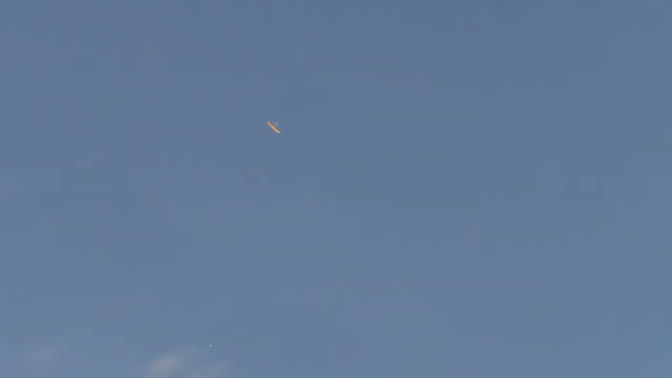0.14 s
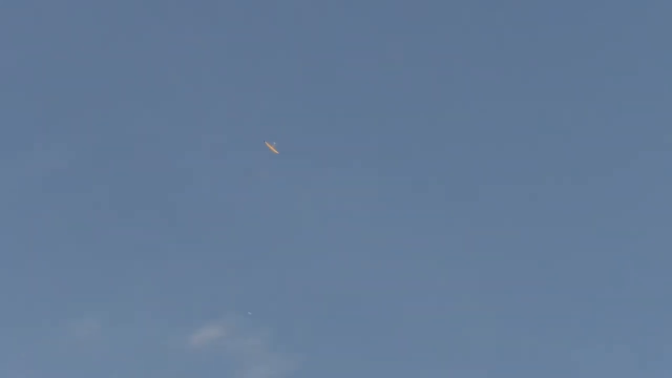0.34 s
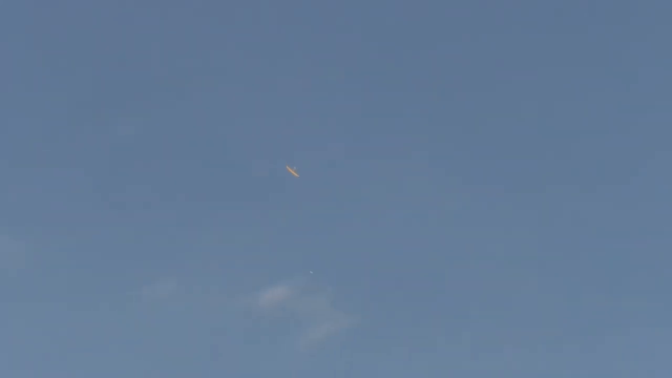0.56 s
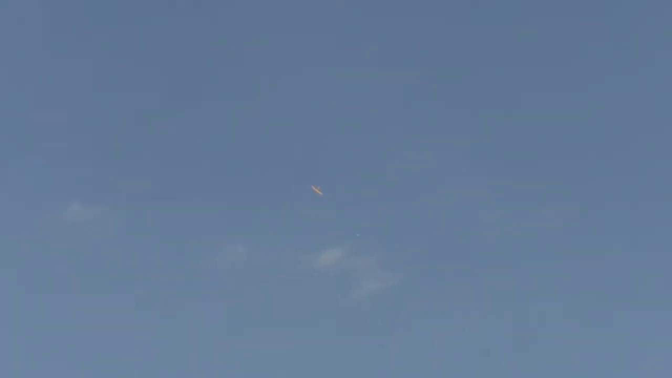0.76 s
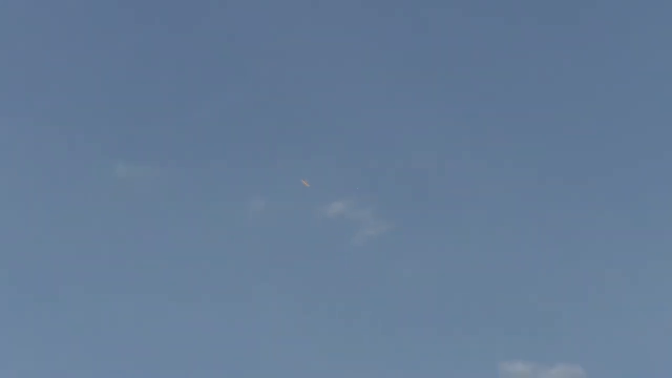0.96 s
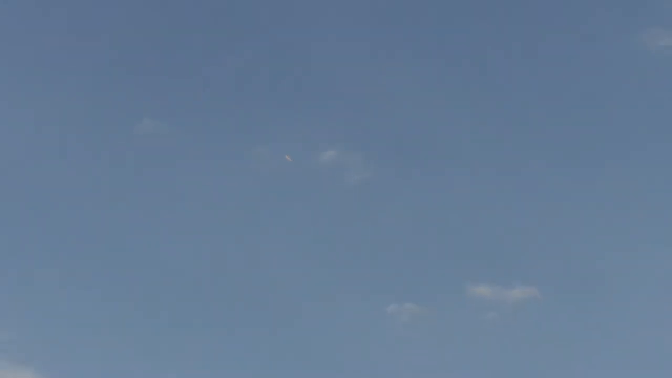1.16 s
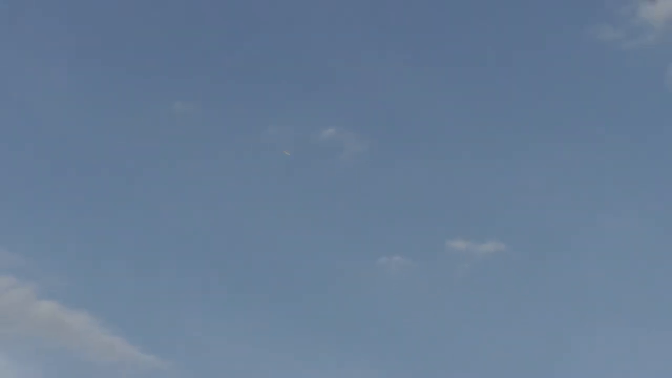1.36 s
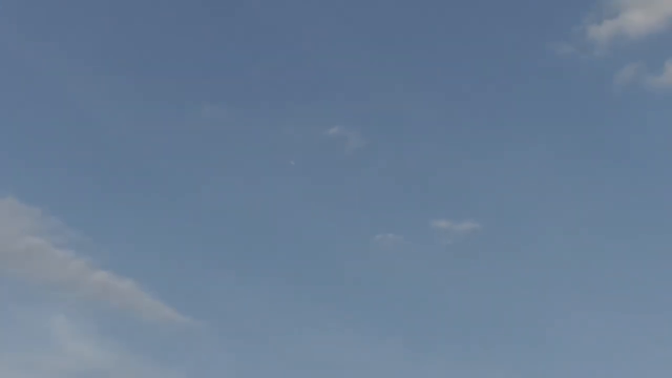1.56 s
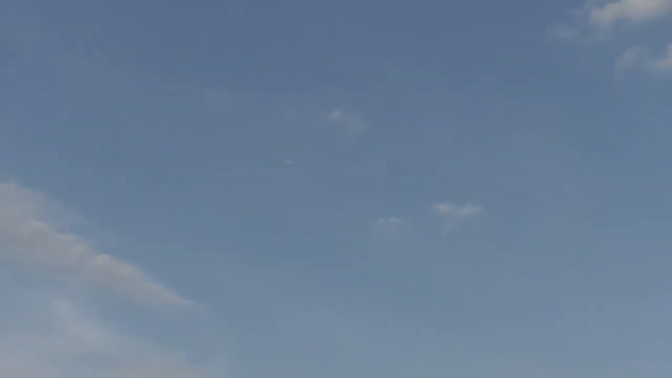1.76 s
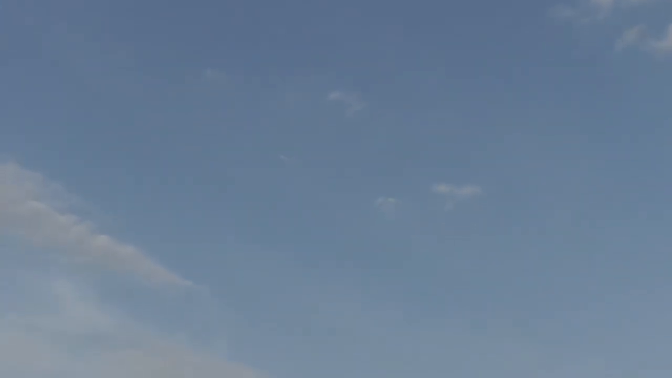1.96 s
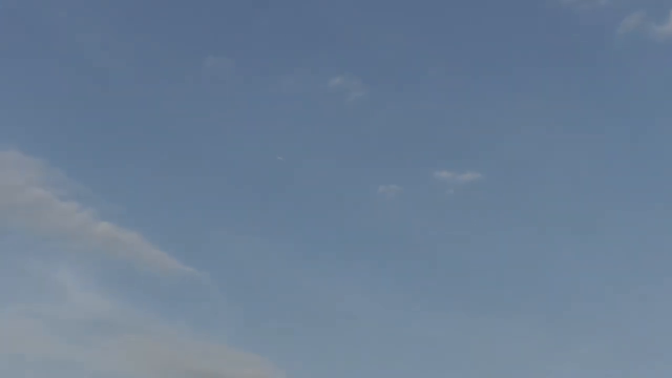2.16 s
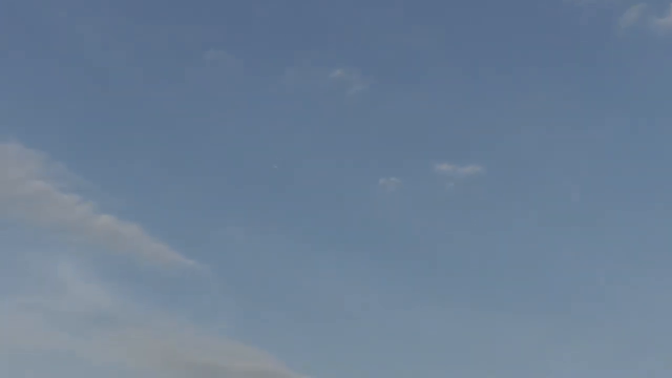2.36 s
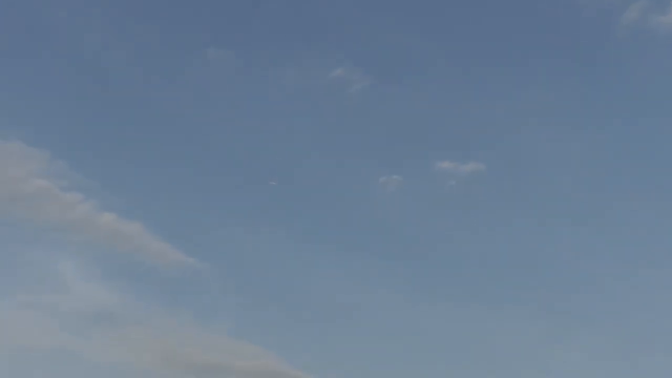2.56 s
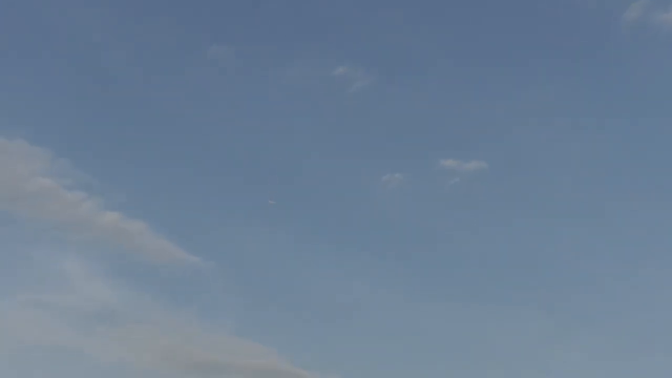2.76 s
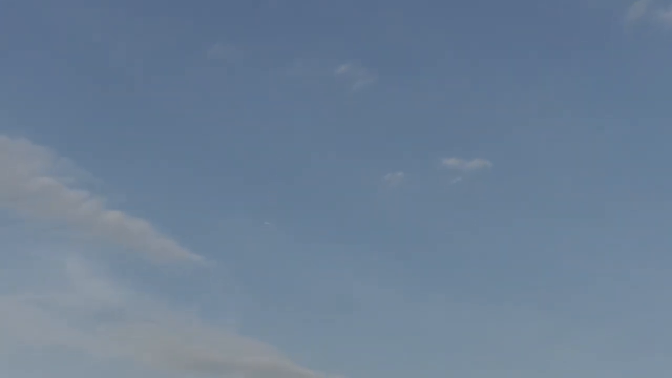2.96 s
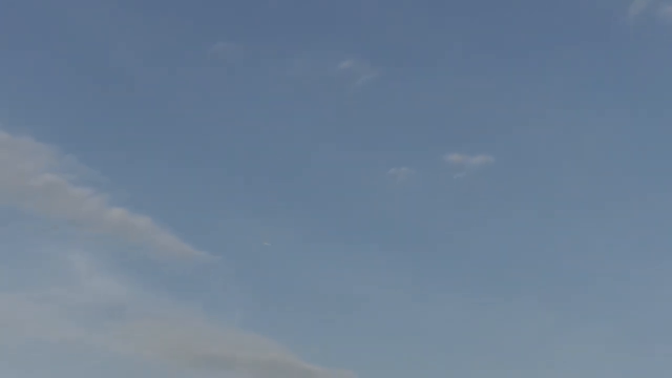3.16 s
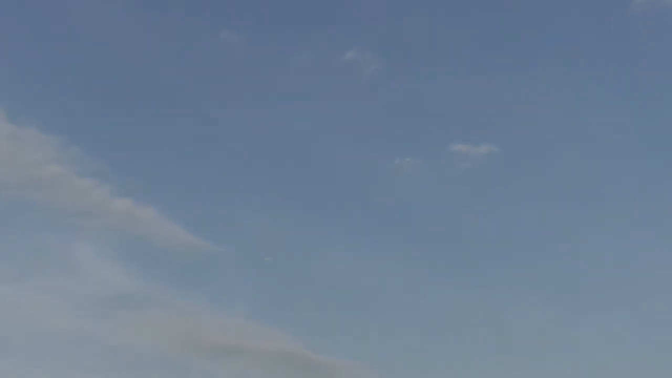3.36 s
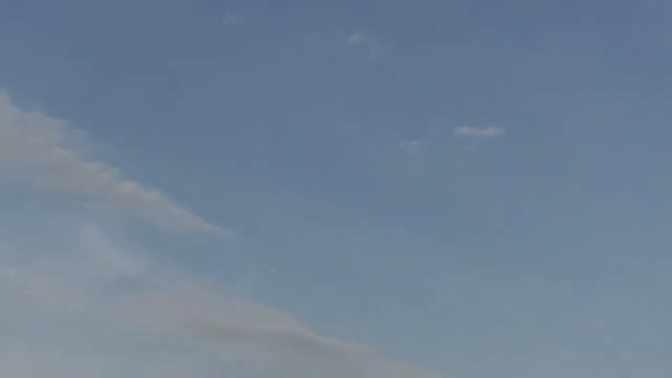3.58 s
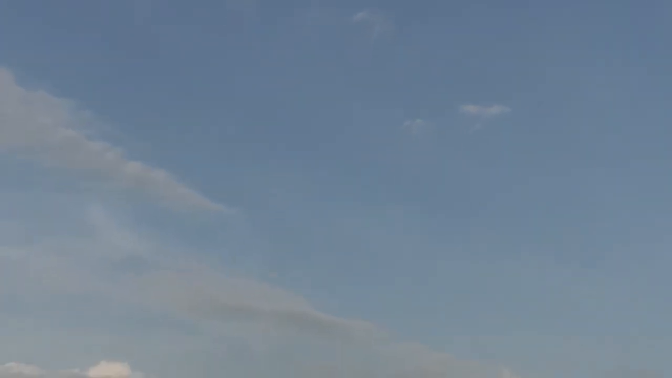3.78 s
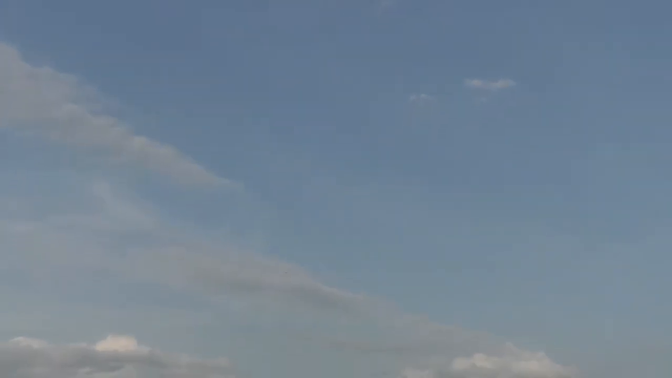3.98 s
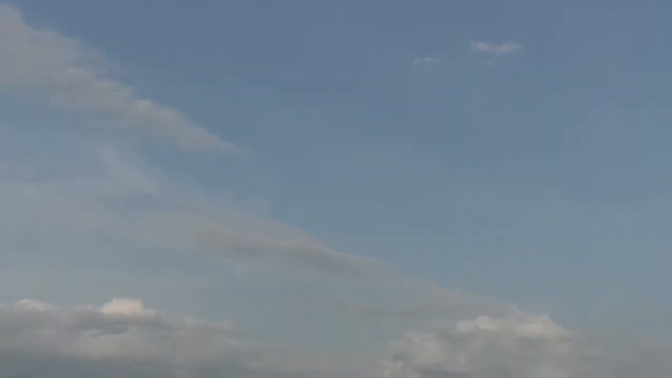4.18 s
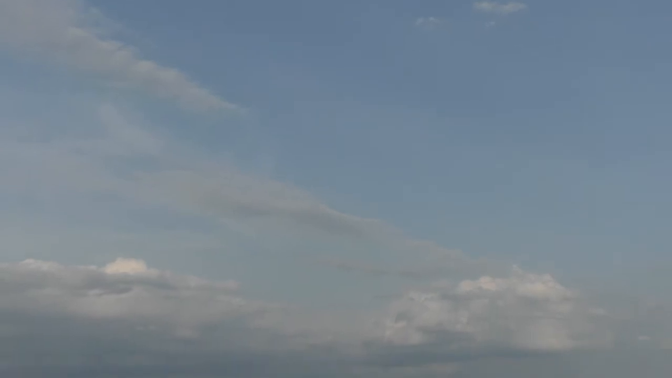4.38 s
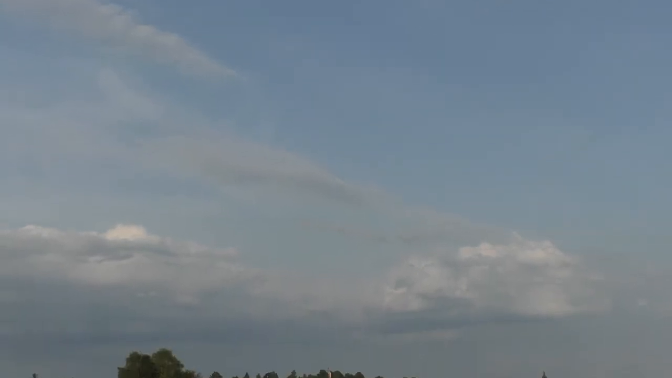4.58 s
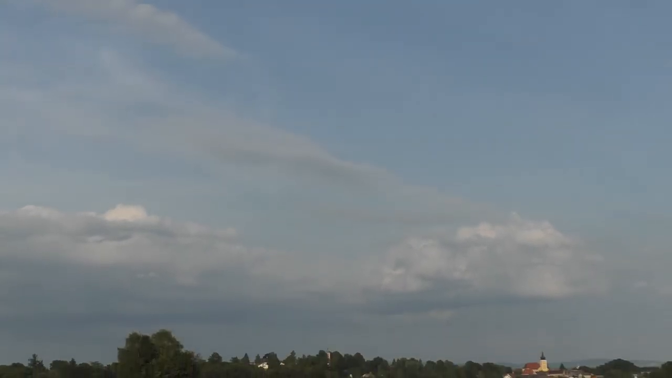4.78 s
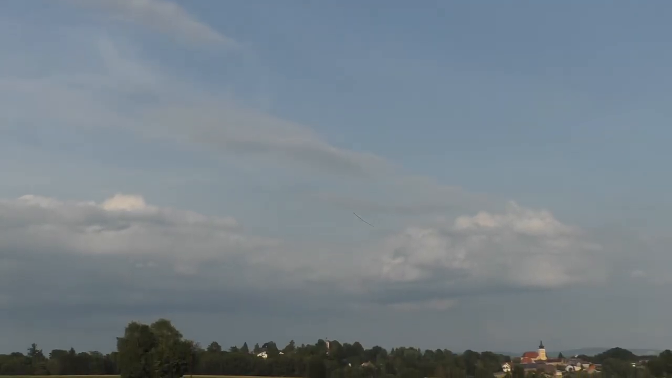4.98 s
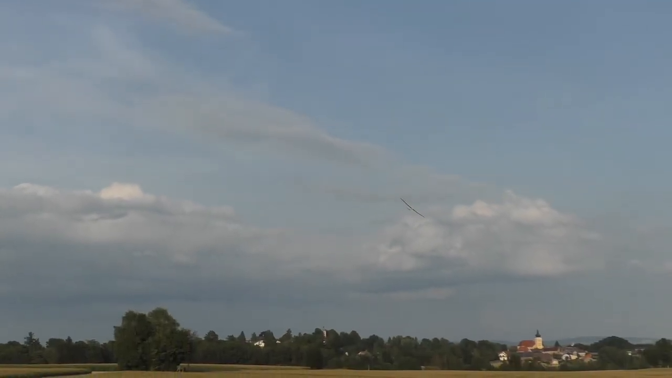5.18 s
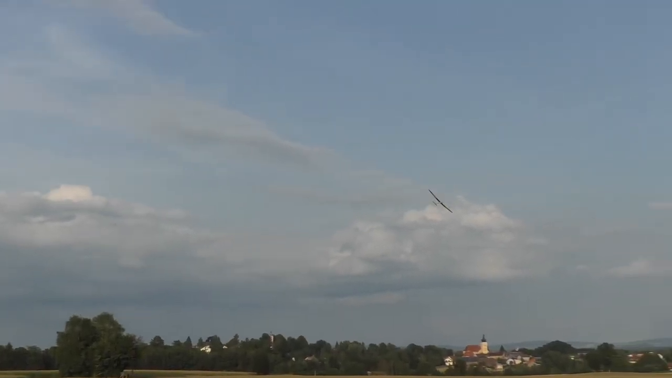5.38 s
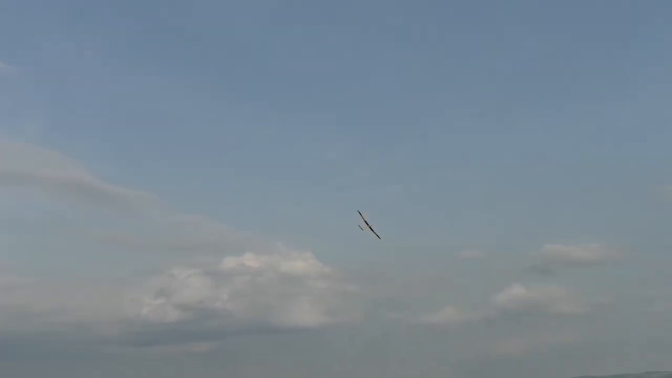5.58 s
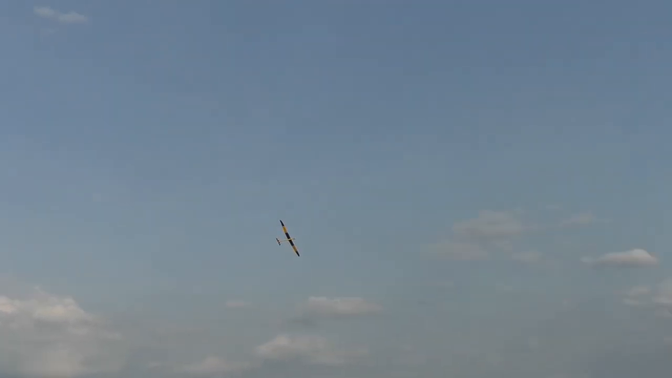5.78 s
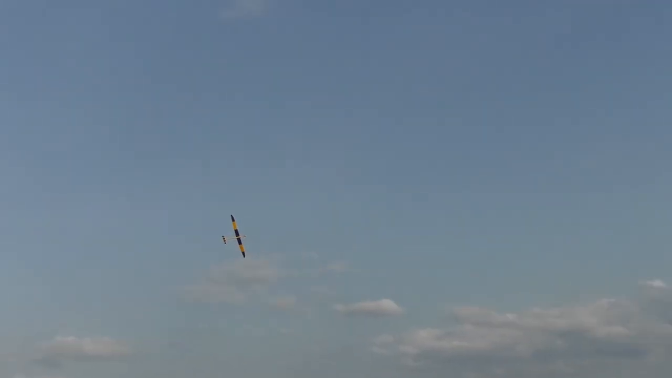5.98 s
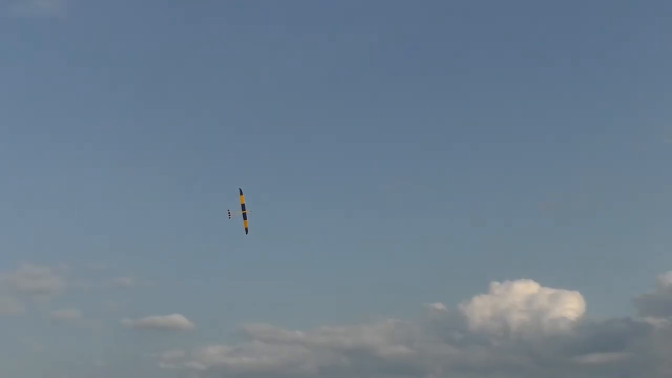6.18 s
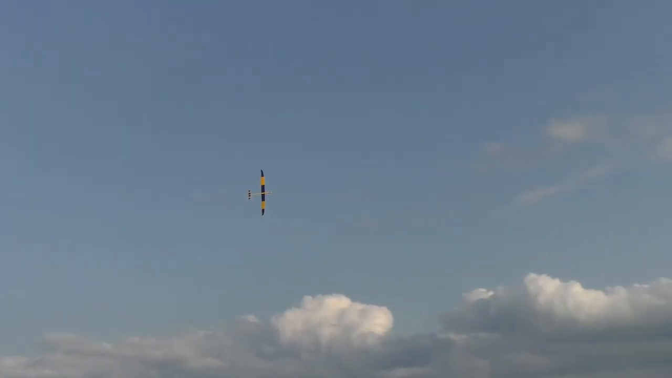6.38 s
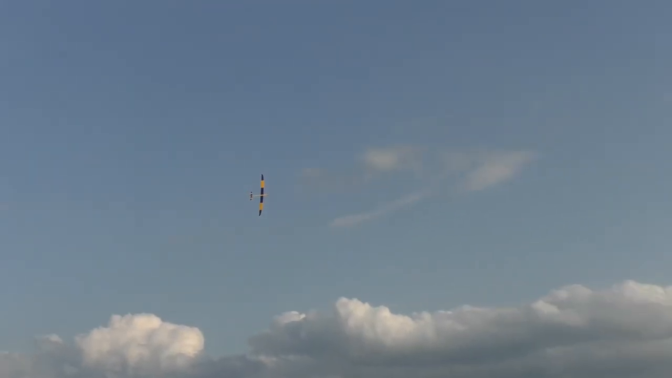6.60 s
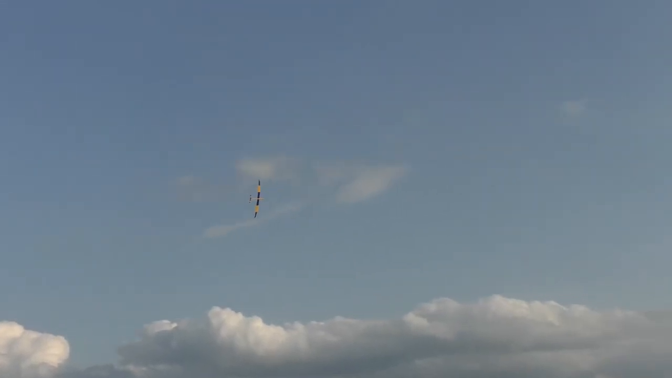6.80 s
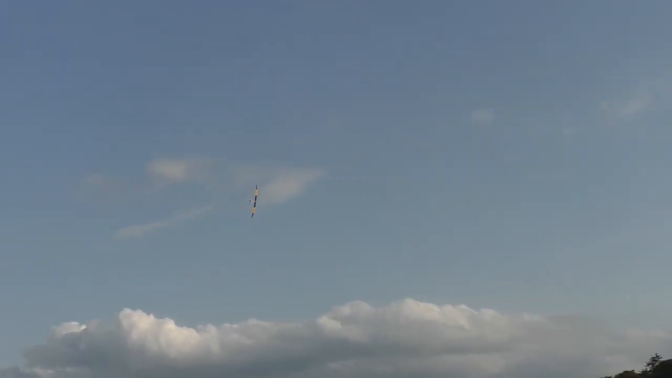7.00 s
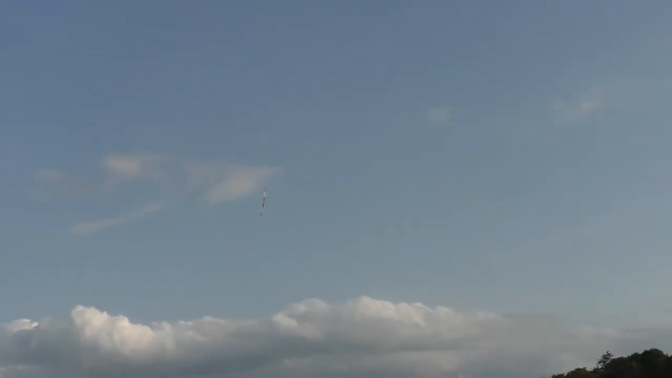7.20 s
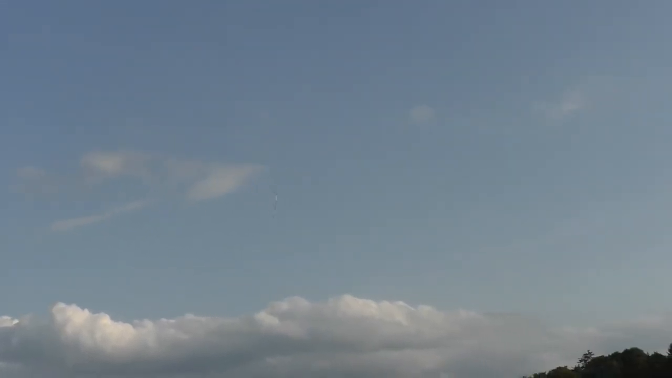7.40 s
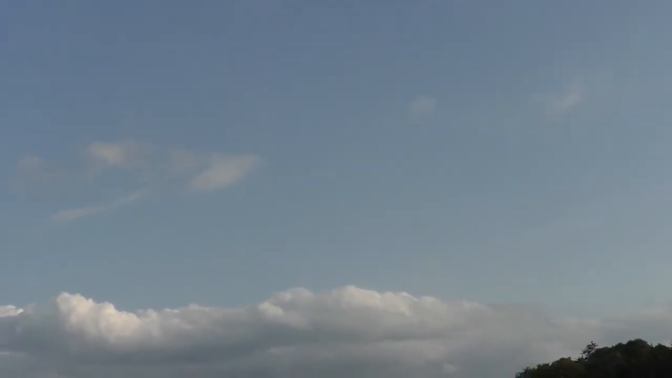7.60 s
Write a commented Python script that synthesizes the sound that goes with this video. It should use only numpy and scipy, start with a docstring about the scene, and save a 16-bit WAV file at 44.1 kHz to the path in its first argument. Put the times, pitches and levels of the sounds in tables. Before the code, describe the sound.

From the start, a far model glider sings over open fields as a loose cluster of thin, near-pure whistles, mostly mid-high, fluttering and overlapping within fuzzy air hiss. From 0 to 5 seconds the cluster glides upward as the dive gathers speed, individual whistles flaring and vanishing, strongest in patches around 1 to 2 seconds and again near 4. Soft, dull low bumps on the hand-held camera come at about 0.8 and 3.3 seconds. After 5.3 seconds the rush grows quickly, peaking around 5.9 to 6.4 as a broad, bright whoosh with a sweeping, hollow ground echo. Pitch then slides down and the noise thins until 7.6, leaving weaker whistles. Beneath it all run microphone hiss, a faint fading engine drone near 100 hertz, clearer at the end, and soft low noise swelling about every 1.2 seconds.

```python
"""A model glider dives over open fields, whining and rushing, while a far engine drones
and a soft low noise swells about every 1.2 seconds.
From the start its whine is a cluster of near-sine whistles on one glide of airspeed and Doppler shift;
filtered noise makes the fuzz and rush of the air, and a delayed copy gives the rush its sweeping ground echo.
Twice during the dive a bump on the hand-held camera sounds as a short damped low tone.
Near six seconds the glider sweeps past at its loudest, then climbs away as pitch and air noise fall."""
import sys
import numpy as np
from scipy import signal
from scipy.fft import rfft, irfft
from scipy.io import wavfile
from scipy.ndimage import uniform_filter1d, map_coordinates

SR = 44100
rng = np.random.default_rng(int(sys.argv[2]) if len(sys.argv) > 2 else 0)


def store_wav(level_fs):
    """Save 16-bit WAV to argv[1]."""
    pcm = np.round(np.clip(np.atleast_2d(level_fs), -1, 1) * 32767)
    wavfile.write(sys.argv[1], SR, pcm.T.astype(np.int16))


N = 337365
TIME = np.arange(N) / SR


def gain_of(db):
    """Level law: decibels to amplitude gain."""
    return 10 ** (np.asarray(db) / 20)


def evened(x):
    """Power normalisation: scales a signal to an rms of one."""
    return x / np.sqrt(np.mean(x ** 2) + 1e-20)


def curve(points):
    """Linear interpolation of a (time, value) table at every sample."""
    return np.interp(TIME, *np.transpose(points))


def smoothed_curve(points):
    """Moving average: the same curve with its corners rounded over a quarter second."""
    return uniform_filter1d(curve(points), size=SR // 4, mode="nearest")


def read(points, hz, axis=1):
    """Logarithmic frequency scale: interpolates one column of a spectrum table."""
    table = np.transpose(points)
    return np.interp(np.log(hz + 1), np.log(table[0]), table[axis])


def wander(rate_hz, size=N):
    """Low-pass random process: smooth chance that moves up to about rate_hz times a second."""
    step, points = 64, 6144  # samples between points, number of points
    hz = np.fft.rfftfreq(points, step / SR)
    spectrum = rfft(rng.standard_normal(points)) / (1 + (hz / rate_hz) ** 2)
    slow = evened(irfft(spectrum))
    return np.interp(np.arange(size) / step, np.arange(points), slow)


# the dive gathers speed and the climb after the pass spends it: (time_s, airspeed_m_per_s)
AIRSPEED_CURVE = [(0.0, 22.1), (0.9, 24.54), (2.55, 32.3), (3.3, 33.49), (4.6, 36.13), (6.05, 35.92),
                  (6.95, 28.97), (7.65, 27.04)]
PASS_S, CLOSEST_M = 5.91, 15.34  # moment and distance of the closest approach
SOUND_M_PER_S = 343


def flight():
    """Doppler effect on a straight pass: relative pitch, airspeed, distance, recession (-1 coming, 1 going)."""
    speed = smoothed_curve(AIRSPEED_CURVE)
    flown = np.cumsum(speed) / SR
    along = flown - np.interp(PASS_S, TIME, flown)
    distance = np.hypot(along, CLOSEST_M)
    receding = along / distance
    # the source pitch is proportional to airspeed
    pitch = speed / (1 + speed * receding / SOUND_M_PER_S)
    return pitch / pitch.max(), speed, distance, receding


def dulling(distance, receding, db_per_m=0.1169, behind=0.36):
    """Absorption and directivity: treble loss in dB at 5 kHz grows with distance, and more so behind."""
    return db_per_m * distance * (1 + behind * receding)


def absorbed_db(hz, loss_db):
    """Classical absorption: the loss grows with the square of the frequency."""
    return loss_db * (hz / 5000) ** 2


# share of fast flutter: every whistle has the calm part; one pitched near ROUGH_HZ adds the rough part
FLUTTER_CALM, FLUTTER_ROUGH, ROUGH_HZ, ROUGH_WIDTH_HZ = .2, .5, 5490, 60


def whistle(pitch, speed, loss_db, start, end, top_hz, cling=0.06, fade_s=0.11, linger_s=.2,
            linger_db=-14, waver=0.000862, jitter=0.0012, twinkle_db=2.5):
    """Aeolian tone: vortices shed in step sing a near sine; eddies shake its pitch and strength."""
    on = (TIME > start - 2 * linger_s) & (TIME < end + 2 * linger_s)
    t, out = TIME[on], np.zeros(N)
    roughness = np.exp(-((top_hz - ROUGH_HZ) / ROUGH_WIDTH_HZ) ** 2)
    flutter = FLUTTER_CALM + FLUTTER_ROUGH * roughness
    # once locked in, a whistle clings a little to its pitch as the airspeed changes
    hz = top_hz * pitch[on] * (speed[on] / speed[on].mean()) ** -cling
    slow_shake = waver * wander(12, size=len(t))
    fast_shake = jitter * flutter * wander(110, size=len(t))
    hz = hz * (1 + slow_shake + fast_shake)
    # the feedback takes a moment to lock in, and sings faintly before and after
    inside = np.minimum(t - start, end - t)
    locked = .5 + .5 * np.tanh(2 * inside / fade_s)
    faint = gain_of(linger_db) * np.clip(1 + inside / (2 * linger_s), 0, 1)
    twinkle = gain_of(twinkle_db * wander(7.8, size=len(t)))
    strength = twinkle * (1 + flutter * wander(90, size=len(t)))
    # the level follows the fuzz that feeds the whistle
    time_s, _, fuzz_db = np.transpose(AIR_LEVELS)
    level = gain_of(np.interp(t, time_s, fuzz_db) - absorbed_db(hz, loss_db[on]))
    tone = np.sqrt(2) * np.sin(2 * np.pi * np.cumsum(hz) / SR)
    out[on] = level * np.maximum(locked, faint) * evened(strength) * tone
    return out


# distinct whistles, pitch at the top of the glide, level over the fuzz of the moment,
# before absorption and the shared trim: (start_s, end_s, pitch_hz, level_db)
WHISTLE_EVENTS = [(-0.1, 0.2, 3916, -2.5), (-0.1, 0.45, 3725, 4.5), (-0.1, 0.7, 5610, -4.5),
                  (-0.1, 1.45, 2795, 2.5), (0.11, 1.02, 2295, 2.5), (0.15, 0.6, 3580, -1.5),
                  (0.25, 0.75, 4157, 2.5), (0.6, 1.45, 4839, 4.5), (0.6, 1.6, 5381, 0.0),
                  (0.62, 0.88, 4453, 3.0), (0.78, 1.37, 4125, 8.5), (0.9, 1.25, 3704, 5.5),
                  (1.0, 1.32, 4090, 9), (1.15, 1.33, 4553, 5.5), (1.33, 1.7, 4438, 9.5),
                  (1.45, 1.7, 2787, 11.5), (1.55, 1.92, 3230, 5.5), (1.55, 2.06, 4111, 5.0),
                  (1.6, 2.15, 3677, 0.0), (1.72, 2.2, 3507, 7.0), (1.76, 2.05, 4232, 6.0),
                  (1.8, 2.4, 7100, -5.5), (1.83, 2.26, 4761, 10), (1.94, 2.14, 2788, 6.0),
                  (2.2, 2.85, 3600, 6.0), (2.4, 2.77, 3070, 0.5), (2.5, 3.3, 6454, -5.5),
                  (2.6, 3.0, 5691, -1.5), (2.7, 3.3, 5470, -5.5), (2.7, 3.55, 4318, 6),
                  (2.7, 3.7, 6896, -4.0), (2.75, 3.7, 5156, -1.5), (2.8, 3.5, 3200, -2.5),
                  (3.0, 3.62, 3509, -3.0), (3.3, 5.0, 6435, 1.0), (3.58, 4.45, 3992, 8),
                  (3.62, 4.2, 3490, 2.5), (3.62, 4.79, 9261, 2.0), (3.68, 4.55, 5492, 3.5),
                  (3.7, 4.6, 6850, -5), (4.42, 5.11, 3487, 3.0), (4.45, 5.2, 4018, 6.0),
                  (4.48, 5.2, 8792, -1.0), (5.1, 6.0, 9232, 4.5), (5.33, 5.86, 3505, -2.5),
                  (5.4, 6.55, 10970, -10), (5.45, 6.0, 5290, -6), (5.65, 6.35, 6425, -7.0),
                  (5.68, 5.9, 4025, -1), (5.75, 6.8, 5203, -4.5), (5.87, 6.2, 4798, -2),
                  (5.95, 6.55, 4047, -4.5), (6.0, 6.55, 9234, -4.0), (6.2, 7.35, 3663, -7),
                  (6.25, 6.75, 4875, -5.5), (6.3, 7.05, 5450, -8), (6.3, 7.15, 5686, -4),
                  (6.5, 6.8, 3570, 0), (6.55, 7.0, 8720, -14), (6.7, 6.95, 6400, -2.0),
                  (6.7, 7.2, 10429, -7.0), (6.75, 7.2, 4906, -2.5), (6.8, 7.8, 5266, -1.5),
                  (6.95, 7.8, 6421, -7.5), (7.05, 7.38, 4694, 0.5), (7.46, 7.8, 3674, 4),
                  (7.5, 7.8, 4164, 4), (7.5, 7.8, 4730, 2)]


def whistles(pitch, speed, loss_db, trim_db=0.67):
    """Superposition of aeolian tones: the distinct whistles of wings and tail."""
    return sum(gain_of(trim_db + db) * whistle(pitch, speed, loss_db, start, end, hz)
               for start, end, hz, db in WHISTLE_EVENTS)


def faint_whistles(pitch, speed, loss_db, count=150, low_hz=3500, high_hz=5750, length_s=.45,
                   level_db=-8.5, spread_db=3, fuzz_share=0.72, fast_db=-5):
    """Intermittent vortex locking: weak whistles at chance pitches follow the fuzz and weaken at top speed."""
    out = np.zeros(N)
    for k, (when, where, loud) in enumerate(rng.random((count, 3))):
        middle = (k + when) / count * TIME[-1]
        start, end = middle - length_s / 2, middle + length_s / 2
        hz = low_hz * (high_hz / low_hz) ** where
        db = level_db + spread_db * (2 * loud - 1) + fuzz_share * read(FUZZ_SPECTRUM, hz)
        out += gain_of(db) * whistle(pitch, speed, loss_db, start, end, hz)
    return out * gain_of(fast_db * (speed / speed.max()) ** 10)


# course of the air noises before their trims, airframe rush and trailing-edge fuzz:
# (time_s, rush_level_db, fuzz_level_db)
AIR_LEVELS = [(0.0, -54.5, -49), (0.75, -48, -49.5), (2.7, -47, -40.5), (3.1, -46.5, -44.5),
              (4.05, -44, -38), (4.7, -42, -41.5), (5.17, -40, -43), (5.46, -35, -29), (5.95, -28.5, -25.5),
              (6.35, -29, -25), (7.0, -38, -34.5), (7.65, -47, -42.5)]
# relative spectrum of the airframe rush at the top of the glide: (frequency_hz, density_db_per_hz)
RUSH_SPECTRUM = [(60, -13), (300, -3.5), (520, -13), (780, -7.5), (1080, -8), (1300, 2), (1600, 2.5),
                 (1950, -1.5), (2600, -2), (4200, -2), (8000, -46)]
# relative spectrum of the trailing-edge fuzz, likewise: (frequency_hz, density_db_per_hz)
FUZZ_SPECTRUM = [(2300, -44), (3100, -5), (3650, 0.5), (4500, -2), (5300, 2.5), (6300, -1), (7600, -4.5),
                 (9500, -2.5), (11500, -2.5), (15000, -8)]
# brief flares of the fuzz during the dive: (time_s)
FLARE_TIMES = [1.14, 1.72, 2.1, 3.38]
FLARE_S, FLARE_DB = .09, 4
# part of the fuzz beamed to the side, placed at the top of the glide
BEAM_DB, BEAM_HZ, BEAM_WIDTH_HZ = 4.2, 5250, 480


def air(pitch, loss_db, receding, rush_db=1.0, fuzz_db=-2.5, rush_slide=0.46, port_hz=8400,
        port_width_hz=450, port_db=6, gust_db=0.74, streak_db=3.2):
    """Turbulence noise: the trailing-edge fuzz slides with the whistles, the low rush only in part."""
    hz, t, noise = signal.stft(rng.standard_normal(N), SR, nperseg=1024, noverlap=768)
    hz, slide = hz[:, None], np.interp(t, TIME, pitch)
    time_s, *levels = np.transpose(AIR_LEVELS)
    # distance dulls the noise; the cavity of the microphone port lifts one band
    cavity_db = port_db / (1 + ((hz - port_hz) / port_width_hz) ** 2)
    colour = cavity_db - absorbed_db(hz, np.interp(t, TIME, loss_db))
    # the upper hump of the fuzz is beamed sideways, so it stands out as the glider comes abreast
    abreast = 1 - np.interp(t, TIME, receding) ** 2
    beam_db = BEAM_DB * abreast * np.exp(-((hz / slide - BEAM_HZ) / BEAM_WIDTH_HZ) ** 2)
    rush_shape = read(RUSH_SPECTRUM, hz / slide ** rush_slide)
    fuzz_shape = read(FUZZ_SPECTRUM, hz / slide) + beam_db
    flare_db = FLARE_DB * sum(np.exp(-((t - at) / FLARE_S) ** 2) for at in FLARE_TIMES)
    power = 0
    for shape, level, trim in zip((rush_shape, fuzz_shape), levels, (rush_db, fuzz_db + flare_db)):
        density = gain_of(shape + colour) ** 2
        power = power + density / density.mean(0) * gain_of(np.interp(t, time_s, level) + trim) ** 2
    # eddies favour narrow bands for a moment, and these ride the glide as streaks
    patches = uniform_filter1d(rng.standard_normal(noise.shape), size=2, axis=0)
    patches = evened(uniform_filter1d(patches, size=40, axis=1))
    rows, frames = np.indices(noise.shape)
    streaks = map_coordinates(patches, [rows / slide, frames], order=1, mode="mirror")
    gusts = np.interp(t, TIME, wander(6.2))
    swell = gain_of(streak_db * streaks + gust_db * gusts)
    shaped = noise * np.sqrt(power) * evened(swell)
    return signal.istft(shaped, SR, nperseg=1024, noverlap=768)[1][:N]


# lag of the ground echo, short while the glider is low over the horizon: (time_s, lag_ms)
ECHO_LAG = [(0, 7.3), (2.5, 4.8), (3.3, 4.22), (5, 2.05), (5.4, 1.9), (5.8, 2.2), (6.2, 3), (6.55, 3.36),
            (7.65, 3.1)]


def ground_echo(x, echo_db=-9.0, dull_hz=2500):
    """Comb filtering: the field returns a duller, later copy whose changing lag sweeps the comb."""
    lag_ms = smoothed_curve(ECHO_LAG)
    soft = signal.lfilter(*signal.butter(1, dull_hz, fs=SR), x)
    late = np.interp(TIME - lag_ms / 1000, TIME, soft)
    return x + gain_of(echo_db) * late


def ground_scatter(x, decay_s=0.0025):
    """Diffuse scattering: sound from the rough field arrives from the sides, opposite in the two ports."""
    t = np.arange(SR // 20) / SR
    taps = rng.standard_normal(len(t)) * np.exp(-t / decay_s)
    side = signal.fftconvolve(x, taps / np.linalg.norm(taps))[:N]
    return np.array([side, -side])


# firing rate of the far engine: (time_s, pitch_hz)
ENGINE_PITCH = [(0, 102.8), (2, 101.2), (4.5, 99.75), (7.65, 95.65)]
# slow fading of its fundamental, before the quick waver: (time_s, level_db)
FUNDAMENTAL_LEVEL = [(0, -41.5), (1.55, -40.5), (2.02, -43.5), (2.3, -53), (2.52, -42), (3.45, -46),
                     (3.72, -41), (4.1, -42.5), (4.9, -54.5), (5.3, -44), (6.3, -35), (7.65, -36)]
# slow fading of its second harmonic, likewise: (time_s, level_db)
OCTAVE_LEVEL = [(0, -55.5), (2.2, -45), (3.1, -49.5), (3.45, -57), (5.5, -56), (6.1, -45.5), (7, -39),
                (7.65, -48)]


def drone(waver_db=1.26):
    """Harmonic series: a far engine, of which only the two lowest harmonics carry."""
    angle = 2 * np.pi * np.cumsum(curve(ENGINE_PITCH)) / SR
    fundamental = gain_of(curve(FUNDAMENTAL_LEVEL)) * np.sin(angle)
    octave = gain_of(curve(OCTAVE_LEVEL)) * np.sin(2 * angle)
    return np.sqrt(2) * (fundamental + octave) * gain_of(waver_db * wander(5))


# likeness of the background noise in the two ports: (frequency_hz, coherence_ratio)
PORT_COHERENCE = [(30, 0.24), (100, 0.59), (700, 0.018), (7000, 0.12), (12000, 0.67)]


def ambience(spectrum):
    """Partial coherence: steady noise of a given spectrum, partly shared by the two ports."""
    hz = np.fft.rfftfreq(N, 1 / SR)
    left, other = rfft(rng.standard_normal((2, N)))
    same = np.clip(read(PORT_COHERENCE, hz), -1, 1)
    right = same * left + np.sqrt(1 - same ** 2) * other
    density = gain_of(read(spectrum, hz)) * np.sqrt(SR / 2)
    return irfft(np.array([left, right]) * density, N)


# field ambience and microphone hiss, before the lean to the right: (frequency_hz, density_db_per_hz)
FIELD_SPECTRUM = [(20, -82), (55, -72), (130, -73.5), (280, -77), (500, -90), (1000, -79.5), (3000, -80.5),
                  (5500, -101), (8000, -98), (10500, -91.5), (15500, -94)]


def field(hiss_lean_db=3.0):
    """Stationary noise: field ambience and microphone hiss, louder on the right."""
    return ambience(FIELD_SPECTRUM) * gain_of([[-hiss_lean_db], [hiss_lean_db]])


# soft low noise, before its swells: (frequency_hz, density_db_per_hz)
LOW_NOISE_SPECTRUM = [(130, -105), (200, -75.5), (255, -68.5), (310, -79.5), (390, -77), (480, -89.5),
                      (800, -115)]
# swells of the low noise, gain of each added to the lull: (peak_s, gain_db)
LOW_NOISE_SWELLS = [(0.15, 3.3), (1.4, 2.3), (2.57, 8.3), (3.85, 5.2), (4.88, 7.1), (5.95, 3.1), (7.1, 8.5)]


def low_noise(lull_db=-7, swell_s=0.29):
    """Amplitude modulation: a soft low noise swells about every 1.2 s, now strongly, now weakly."""
    swells = sum(gain_of(db) * np.exp(-((TIME - s) / swell_s) ** 2) for s, db in LOW_NOISE_SWELLS)
    return ambience(LOW_NOISE_SPECTRUM) * (gain_of(lull_db) + swells)


# bumps on the camera, level at the envelope's peak: (start_s, level_db)
BUMP_EVENTS = [(0.839, -28.5), (3.314, -32.5)]


def bumps(body_hz=92, rise_s=0.0073):
    """Damped oscillation: a soft push of the hand rocks the camera body for a few cycles."""
    out = np.zeros(N)
    for s, db in BUMP_EVENTS:
        age = np.maximum(TIME - s, 0)
        envelope = age / rise_s * np.exp(1 - age / rise_s)
        out += gain_of(db) * envelope * np.sin(2 * np.pi * body_hz * age)
    return out


# left microphone port against the right: (frequency_hz, level_difference_db, left_lead_rad)
PORT_DIFFERENCE = [(104, -2.5, -0.28), (312, 0, 1), (1410, -2.5, 0.12), (2660, -1.5, -0.2), (4620, -3, 0.6),
                   (5470, 1.5, -1.35), (6550, -17, -1.6), (8300, -11, 0.44), (9500, -6.5, -0.28),
                   (11900, 0, -0.24)]


def ports(x):
    """Diffraction: the camera body shades and delays one port against the other."""
    hz = np.fft.rfftfreq(N, 1 / SR)
    lead = np.exp(1j * read(PORT_DIFFERENCE, hz, axis=2))
    ratio = gain_of(read(PORT_DIFFERENCE, hz, axis=1)) * lead
    # the mean of the two ports stays equal to the source
    pair = np.array([ratio, np.ones(len(hz))]) * 2 / (1 + ratio)
    return irfft(rfft(x) * pair, N)


def scene(diffuse_db=-10, glance_db=-11):
    """Superposition: glider, ground echo and scatter, far engine, low noise, field and bumps."""
    pitch, speed, distance, receding = flight()
    loss_db = dulling(distance, receding)
    whine = whistles(pitch, speed, loss_db) + faint_whistles(pitch, speed, loss_db)
    direct_air = ground_echo(air(pitch, loss_db, receding))
    # the scattered noise is unrelated to the direct noise
    scattered_air = air(pitch, loss_db, receding)
    scatter = ground_scatter(gain_of(glance_db) * whine + gain_of(diffuse_db) * scattered_air)
    direct = ports(whine + direct_air + drone() + bumps())
    return direct + scatter + low_noise() + field()


def record(dry, edge_hz=15900):
    """Linear-phase low-pass filtering: the band limit of the camera."""
    taps = signal.firwin(511, edge_hz, window=("kaiser", 9), fs=SR)
    return signal.oaconvolve(dry, taps[None], "same")


dry = scene()
out = record(dry)
store_wav(out)
```